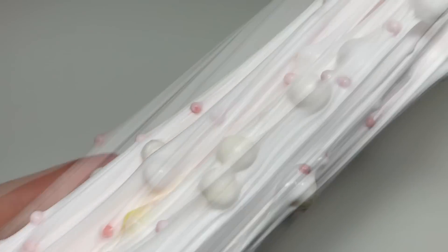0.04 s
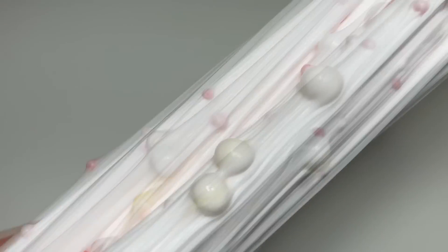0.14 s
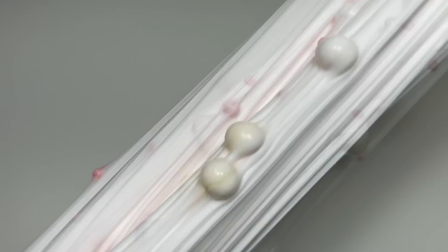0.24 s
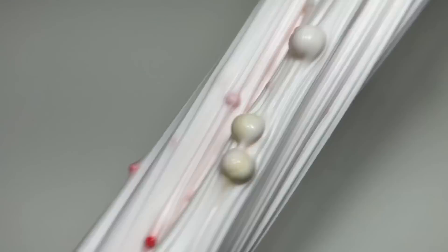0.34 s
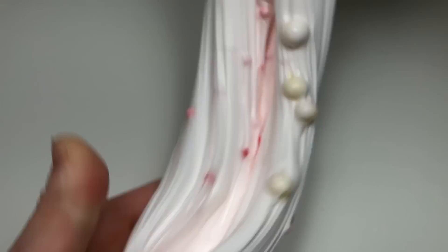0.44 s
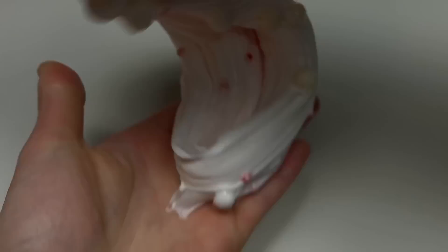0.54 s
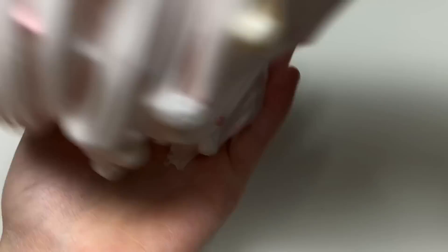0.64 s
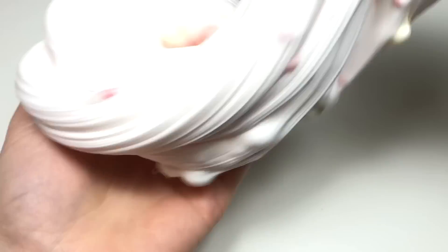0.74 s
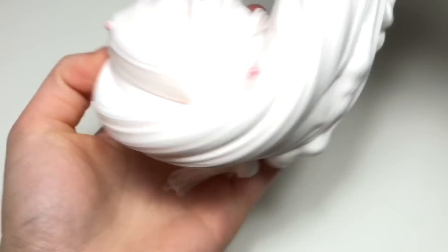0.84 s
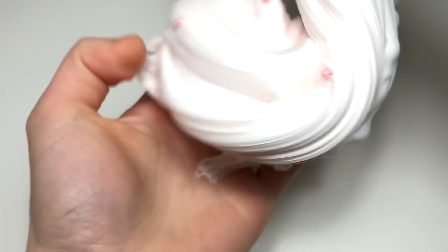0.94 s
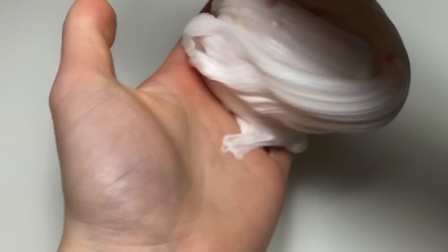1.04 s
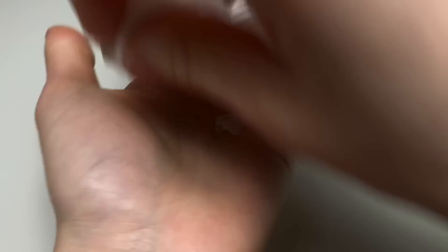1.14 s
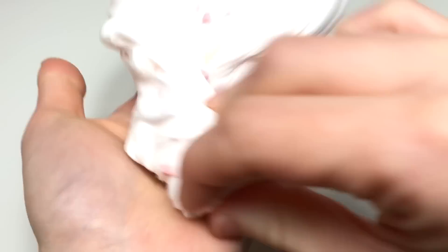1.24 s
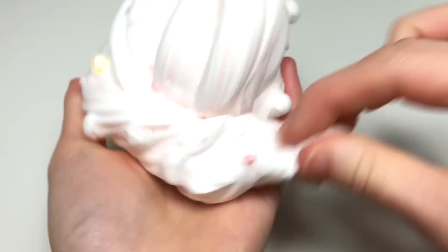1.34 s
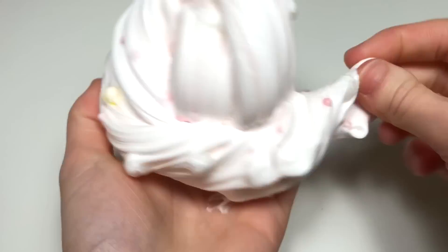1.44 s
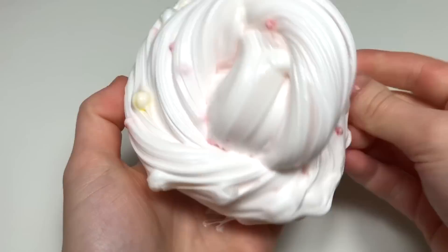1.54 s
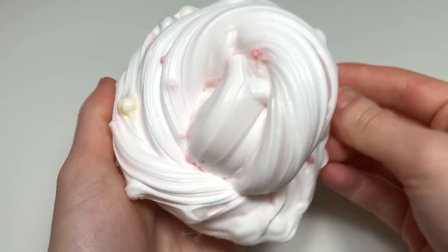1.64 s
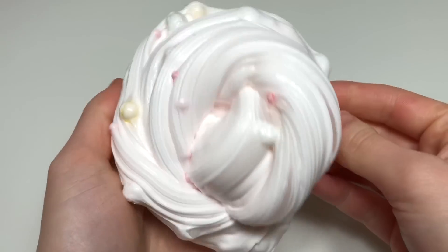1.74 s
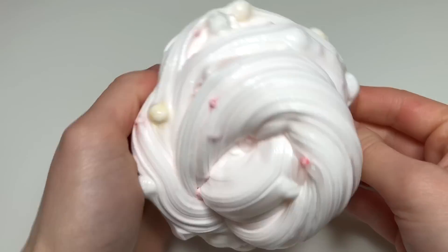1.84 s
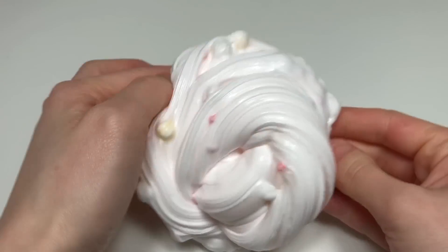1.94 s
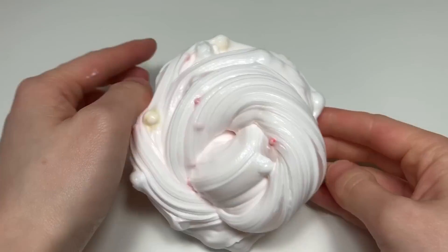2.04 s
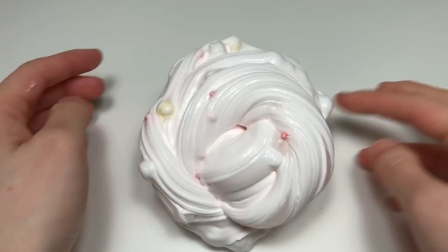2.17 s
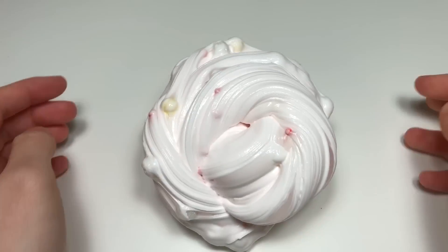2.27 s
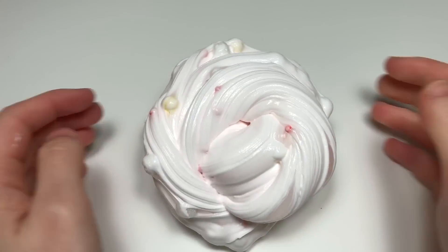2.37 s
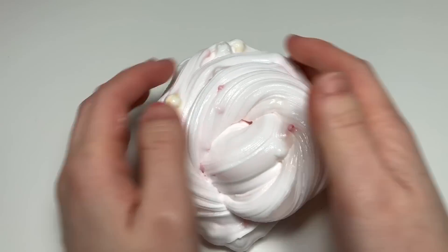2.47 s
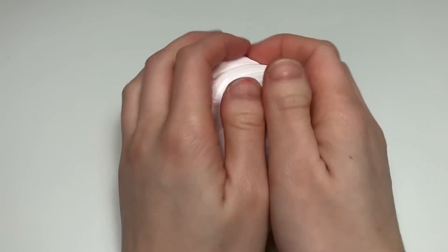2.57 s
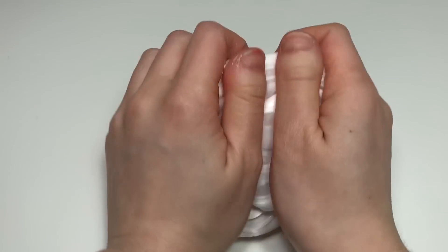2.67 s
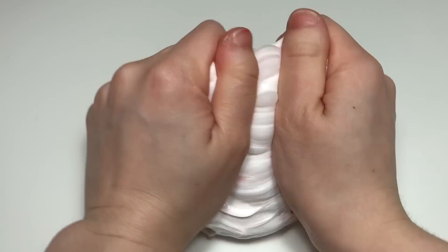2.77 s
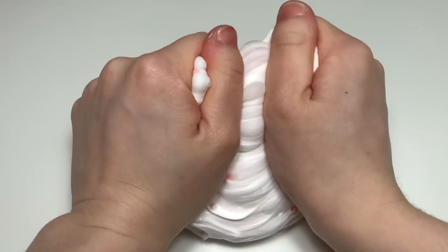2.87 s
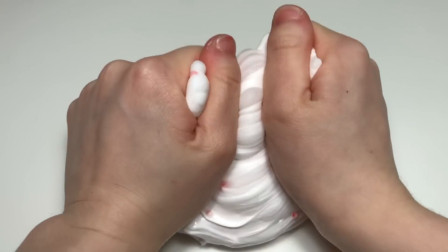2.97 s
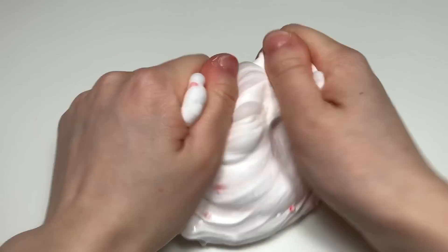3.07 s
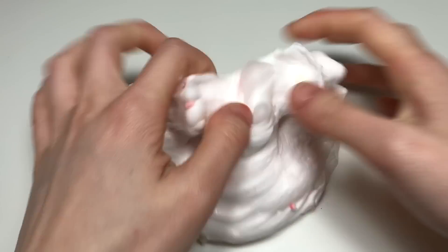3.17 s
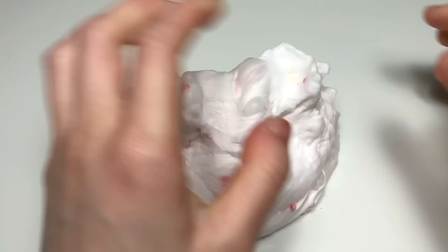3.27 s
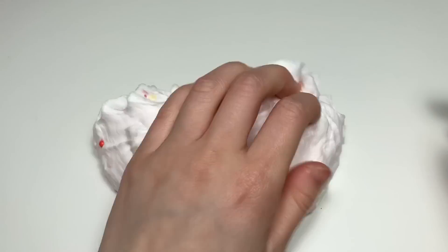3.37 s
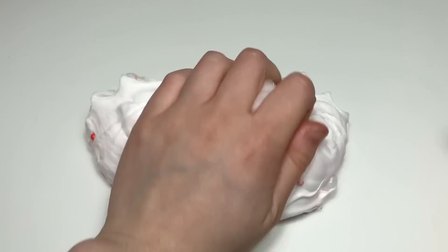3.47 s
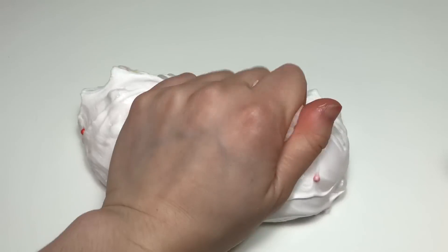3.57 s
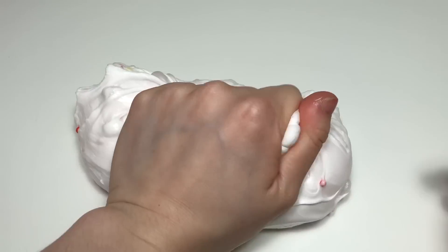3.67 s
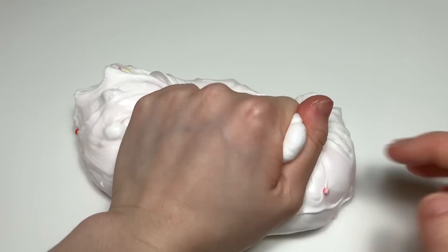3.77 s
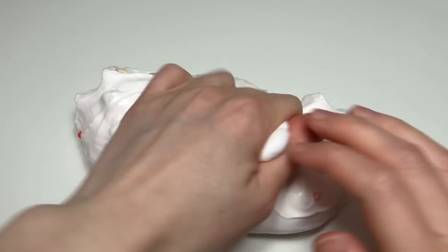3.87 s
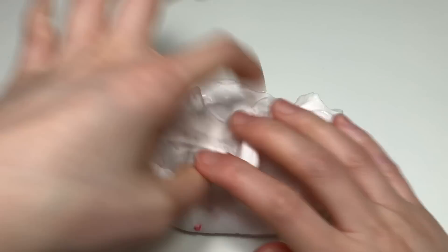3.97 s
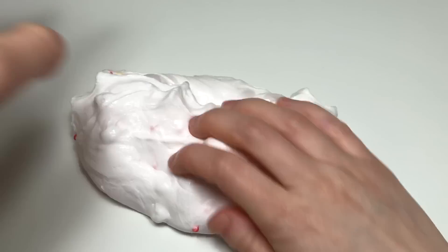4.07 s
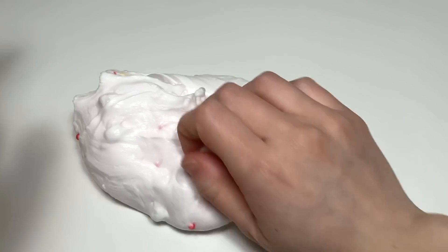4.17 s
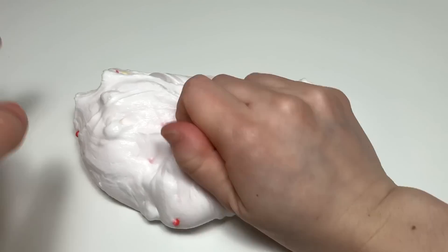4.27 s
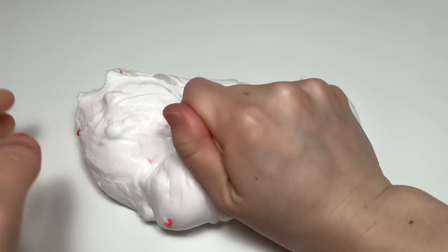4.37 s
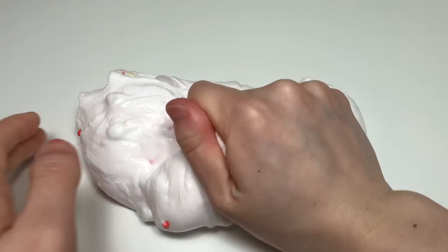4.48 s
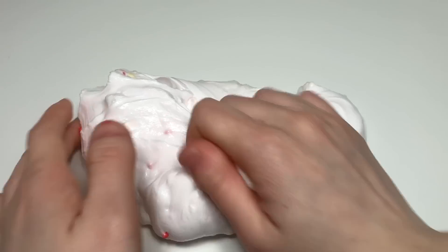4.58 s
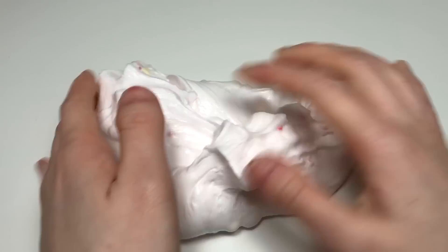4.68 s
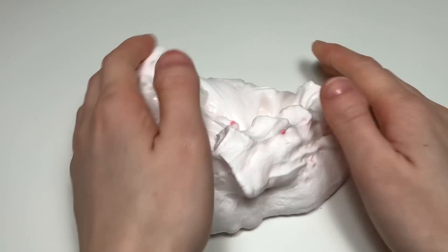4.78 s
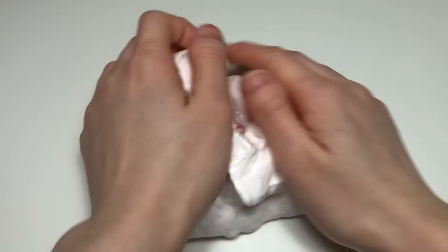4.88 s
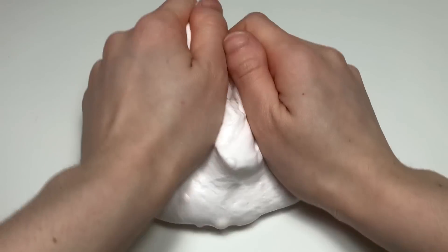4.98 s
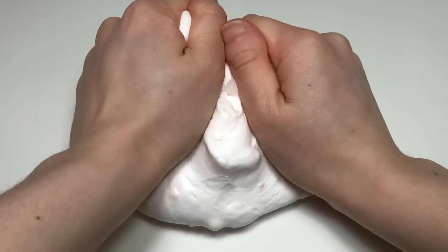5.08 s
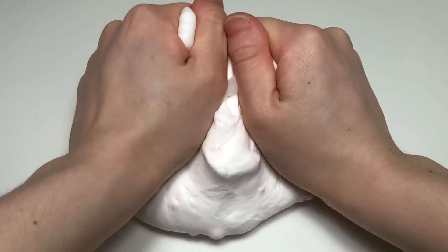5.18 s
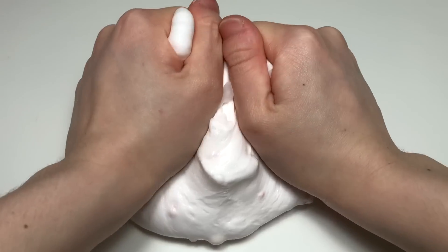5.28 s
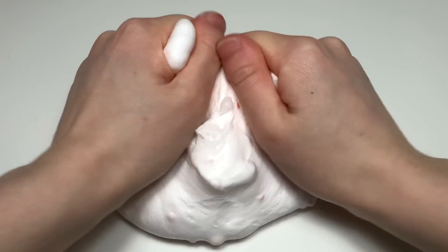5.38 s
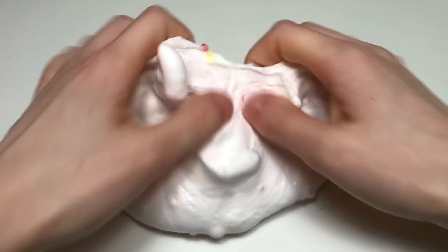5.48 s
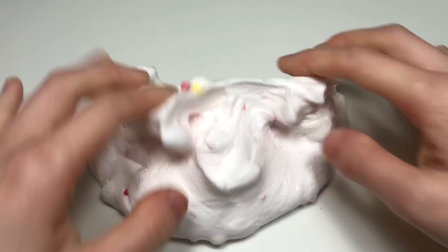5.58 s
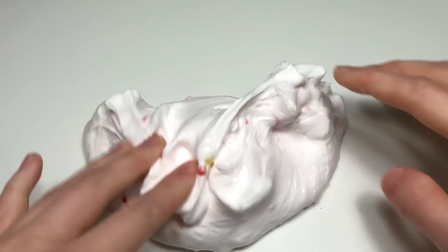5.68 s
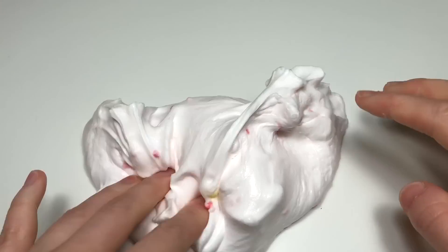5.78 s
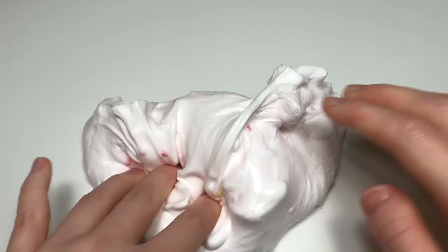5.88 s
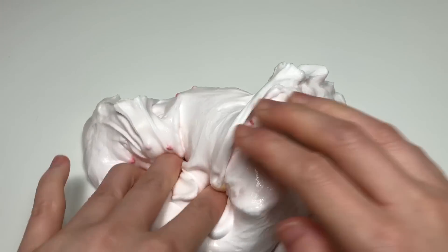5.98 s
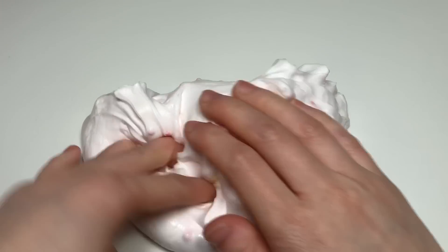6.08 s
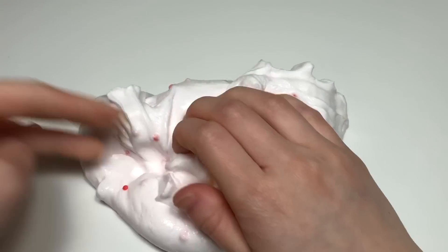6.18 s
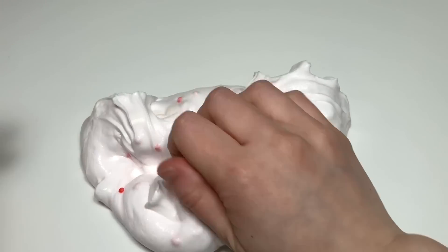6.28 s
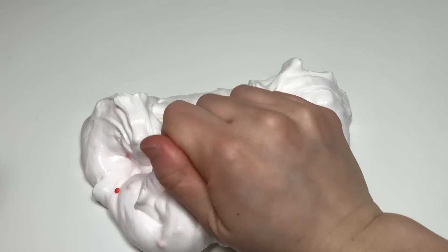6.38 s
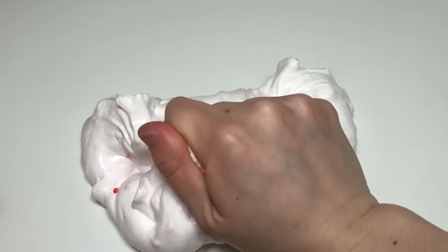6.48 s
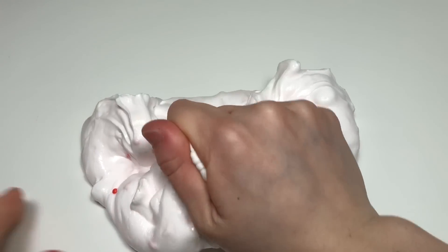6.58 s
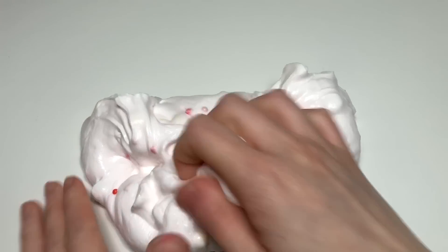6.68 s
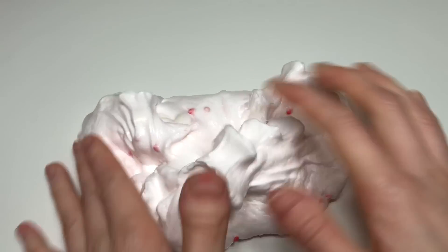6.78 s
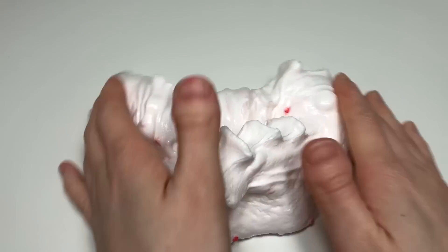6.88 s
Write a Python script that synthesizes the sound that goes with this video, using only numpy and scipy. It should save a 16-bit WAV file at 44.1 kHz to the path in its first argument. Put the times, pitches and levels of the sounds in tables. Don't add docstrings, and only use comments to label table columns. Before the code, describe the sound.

Close wet slime handling: soft tearing fizz and small thuds, then four or five dense volleys of snapping air pockets with squelches and gulps.

```python
import sys
import numpy as np
from scipy import signal
from scipy.fft import rfft, irfft, next_fast_len
from scipy.io import wavfile
from scipy.ndimage import uniform_filter1d, map_coordinates

SR = 44100
rng = np.random.default_rng(int(sys.argv[2]) if len(sys.argv) > 2 else 0)


def makeup_ratio(level_db):
    decades = np.asarray(level_db, float) / 20
    return 10 ** decades


def file_out(sig):
    cols = np.atleast_2d(sig).T
    lim = np.clip(cols, -1, 1)
    pcm = np.round(lim * 32767).astype(np.int16)
    wavfile.write(sys.argv[1], SR, pcm)


N = 305172


def unit(x):
    return x / np.sqrt(np.mean(x ** 2) + 1e-20)


def along(points, hz):
    f, value = np.transpose(points)
    return np.interp(np.log(hz + 1), np.log(f + 1), value)


def filtered(x, response):
    size = next_fast_len(N + 8192)
    hz = np.fft.rfftfreq(size, 1 / SR)
    return irfft(rfft(x, size) * response(hz), size)[:N]


def coloured(x, spectrum):
    return filtered(x, lambda hz: makeup_ratio(along(spectrum, hz)))


def wobble(rate):
    knots = rng.standard_normal(int(N * rate / SR) + 4)
    return map_coordinates(knots, [np.arange(N) * rate / SR])


def modes(table):
    def response(f):
        total = 0
        for k, (centre, width, db) in enumerate(table):
            damping = 1j * f * width
            total = total + (-1) ** k * makeup_ratio(db) * damping / (centre * centre - f * f + damping)
        return total
    return response


def laid(start_s, shapes):
    at = np.round(start_s * SR).astype(int)[:, None] + np.arange(shapes.shape[1])
    return np.bincount(at.ravel(), shapes.ravel(), N + SR)[:N]


def rung(hz, cycles, t):
    return np.sin(2 * np.pi * hz * t) * np.exp(-t * hz / cycles)


def banded(noise, hz, cycles):
    kernel = rung(hz, cycles, np.arange(128) / SR)
    kernel /= np.linalg.norm(kernel, axis=1, keepdims=True)
    return signal.fftconvolve(noise, kernel, axes=1)[:, :noise.shape[1]]


def patchy(x, depth_db):
    z = signal.stft(x, nperseg=256)[2]
    field = uniform_filter1d(rng.standard_normal(z.shape), size=9, axis=0)
    field = uniform_filter1d(field, size=18, axis=1)
    return signal.istft(z * makeup_ratio(depth_db * unit(field)), nperseg=256)[1][:N]


def swells(peak_s, db, rise_s, fall_s):
    roundness = 1.8
    at = np.arange(0, N + 64, 64)
    late = at[:, None] / SR - peak_s
    away = np.maximum(late / np.clip(fall_s, .01, 9), -late / np.clip(rise_s, .01, 9))
    power = np.sum(makeup_ratio(db - 20 * away ** roundness) ** 2, axis=1)
    return np.interp(np.arange(N), at, 10 * np.log10(power + 3e-8))


def background():
    # (frequency [Hz], density [dB per Hz])
    air_colour = [(15, -45.5), (25, 7.5), (124, -16.5), (167, 3), (1140, -8), (4100, -53), (5830, -15),
                  (15500, -42)]
    # (frequency [Hz], level [dB])
    partials = [(118.4, -70)]
    mix = makeup_ratio(-70.5) * unit(coloured(rng.standard_normal(N), air_colour))
    for hz, db in partials:
        level = makeup_ratio(db + 2.5 + 1.4 * wobble(3.6))
        mix = mix + level * np.sin(2 * np.pi * hz * np.arange(N) / SR + .4 * wobble(14))
    return mix


def effort():
    # (peak time [s], fizz level [dB], 20 dB rise [s], 20 dB fall [s],
    # squelch over fizz [dB])
    pulls = [(0.15, -53.5, .5, .33, -6), (0.445, -47, .03, .09, 3), (0.56, -52, .07, .11, 3),
             (0.88, -57, .4, .22, -3), (1.2, -61, .18, .2, 4), (1.42, -54, .22, .2, -1),
             (1.635, -54, .05, .055, 2), (1.73, -57, .02, .3, 5), (1.96, -52, .2, .2, -4),
             (2.085, -63, .07, .05, 10), (2.22, -55, .12, .11, -2), (2.43, -52.5, .19, .14, -9)]
    # (peak time [s], fizz level [dB], 20 dB rise [s], 20 dB fall [s],
    # squelch over fizz [dB])
    kneads = [(2.672, -48, 0.012, 0.2, 3), (2.85, -37.5, 0.1423, 0.16, 5.5), (2.96, -28, 0.07, 0.135, -3),
              (3.21, -36, 0.13, 0.085, 3), (3.445, -58, 0.012, 0.4, 1), (3.66, -34, 0.1261, 0.1, 1),
              (3.77, -35, 0.1, .13, -18), (3.99, -44.5, 0.085, 0.1, 6), (4.24, -43, 0.35, 0.46, -11.5),
              (4.446, -26, 0.0226, 0.0865, -11), (4.569, -29.5, .04, 0.08, -3.5),
              (4.678, -42, .12, 0.09, 3.5), (4.95, -43, 0.12, 0.41, -9), (5.19, -31, 0.07, 0.06, 2),
              (5.27, -30, 0.18, 0.1552, -19), (5.32, -33, 0.07, 0.07, 2), (5.521, -43.5, 0.23, 0.1, 1.5),
              (5.7, -68, 1.2, 0.19, 3), (6.185, -45, .02, 0.08, 8), (6.36, -45, 0.22, 0.23, -6),
              (6.52, -33.5, 0.0736, 0.18, -20), (6.587, -31.5, 0.0529, 0.07, 1.5),
              (6.75, -42.5, 0.09, 0.07, 5), (6.9, -47.5, 0.28, 4, -2.5)]
    s, db, rise_s, fall_s, wet_db = np.transpose(pulls + kneads)
    return swells(s, db, rise_s, fall_s), swells(s, db + wet_db, rise_s, fall_s)


def crackle(colour, count, centre_hz, cycles, spread_db, smooth, clump_db):
    at = rng.random(count) * N / SR
    size = makeup_ratio(spread_db * rng.exponential(size=(count, 1)))
    hz = centre_hz * np.exp(0.533 * rng.standard_normal((count, 1)))
    hz = np.clip(hz, 200, SR / 3)
    bursts = laid(at, size * rung(hz, cycles, np.arange(300) / SR))
    bursts /= np.sqrt(np.abs(uniform_filter1d(bursts ** 2, SR // 8)) + 1e-9)
    mix = (bursts + smooth * rng.standard_normal(N)) * makeup_ratio(clump_db * wobble(35))
    return unit(coloured(patchy(mix, depth_db=3.0), colour))


def tearing():
    # (frequency [Hz], density [dB per Hz])
    fizz_colour = [(500, -43), (1500, -14), (3500, -4.5), (8000, -4), (15800, -6.5)]
    # (frequency [Hz], density [dB per Hz])
    squelch_colour = [(150, -30), (400, -9), (1100, -5.5), (2600, -6.5), (5000, -8), (10000, -46)]
    fizz_db, squelch_db = effort()
    fizz = crackle(fizz_colour, count=6000, centre_hz=8000, cycles=1.3,
                   spread_db=2, smooth=1.4, clump_db=1.5)
    sizzle = unit(np.diff(rng.standard_normal(N + 2), 2))
    squelch = crackle(squelch_colour, count=4500, centre_hz=1700, cycles=1.8,
                      spread_db=3.2, smooth=.9, clump_db=2.5)
    mix = makeup_ratio(fizz_db + 0.5) * fizz
    mix = mix + makeup_ratio(0.82 * fizz_db - 20.5) * sizzle
    return mix + makeup_ratio(squelch_db - 1.5) * squelch


def pockets():
    # (time [s], peak level [dB], pitch [Hz])
    ticks = [(0.0059, -26, 5200), (0.016, -32.5, 2000), (0.0418, -31, 6300), (0.0487, -34.5, 9300),
             (0.1111, -31, 4890), (0.132, -25.5, 8000), (0.145, -36, 5900), (0.1496, -31, 3300),
             (0.164, -36, 2400), (0.1683, -36, 7800), (0.1722, -27.5, 6800), (0.187, -34.5, 2100),
             (0.2135, -29, 5360), (0.2327, -29.5, 2980), (0.245, -33, 2500), (0.2609, -28.5, 10400),
             (0.2675, -25.5, 8900), (0.2783, -28.5, 6000), (0.3224, -42, 6000), (0.3301, -45, 8400),
             (0.3534, -37, 6500), (0.4212, -36, 5700), (0.5256, -24.5, 9700), (0.5272, -24, 6400),
             (0.5498, -32, 3900), (0.5782, -34, 2290), (0.636, -40, 5200), (0.7132, -43, 7900),
             (0.7285, -27.5, 1950), (0.7605, -29.5, 1660), (0.775, -41, 2200), (0.9449, -34, 10300),
             (1.0142, -34.5, 13100), (1.0181, -38.5, 9400), (1.0224, -33, 7000), (1.0288, -33, 5400),
             (1.1329, -42, 11000), (1.1608, -36, 9700), (1.3207, -34.5, 8200), (1.326, -37, 8500),
             (1.3965, -37, 6900), (1.4087, -31, 7700), (1.429, -34, 3200), (1.4942, -34, 10400),
             (1.5007, -25, 12500), (1.7114, -28, 1660), (1.9387, -30, 4000), (1.9611, -27, 3300),
             (1.973, -36, 3200), (2.013, -32.5, 4200), (2.0535, -40, 5600), (2.1462, -44, 4600),
             (2.2432, -39, 4900), (2.6215, -37, 4030), (2.6325, -42, 3000), (2.664, -25.5, 9000),
             (2.6657, -34, 3700), (2.6775, -31.5, 2500), (3.2793, -25.5, 7240), (3.4368, -39, 3100),
             (3.4454, -40, 4360), (3.4545, -35, 3900), (3.457, -38, 2600), (3.465, -42.5, 12000),
             (3.8898, -41, 3700),
             (3.9177, -30, 1800), (3.9483, -24, 5300), (4.0045, -26, 9000), (4.02, -29, 4000),
                  (4.818, -32.5, 1800), (4.829, -27.5, 4100), (4.8576, -27, 4000), (4.933, -25, 7300),
                  (5.4145, -27, 5900), (5.4388, -41, 5200), (5.4798, -21.5, 6800), (5.553, -24.5, 7830),
                  (5.7816, -39, 5600), (5.7976, -48.5, 6600), (5.851, -47, 5000), (5.9404, -49, 2110),
                  (5.9425, -38.5, 1400), (5.9456, -45, 1590), (5.9906, -43, 7400), (6.102, -46, 2000),
                  (6.4367, -30, 10900), (6.806, -27.5, 2600), (6.8338, -21.5, 5330)]
    # (time [s], peak level [dB], pitch [Hz], flutter under peak [dB])
    stretch_pops = [
        (0.3457, -18, 11000, -27),
        (1.88, -18, 5870, -18.5),
    ]
    # (time [s], peak level [dB], pitch [Hz], flutter under peak [dB])
    first_pops = [(2.6887, -17, 1600, -18), (2.7535, -8.5, 3700, -15), (2.755, -4.5, 4800, -24),
                  (2.7766, -14.5, 4800, -25), (2.7823, -2.5, 3500, -30.5), (2.7908, 2.5, 4600, -28),
                  (2.8054, 2.5, 6100, -28), (2.8117, -6.5, 9500, -16), (2.8142, -3, 8700, -27.5),
                  (2.8184, 1.5, 7400, -11), (2.8215, 0.5, 7900, -23), (2.825, -6, 5000, -18),
                  (2.8376, -3, 8900, -22.5), (2.8385, -1.5, 8900, -26), (2.8466, -2, 5400, -12),
                  (2.849, -1, 4800, -12), (2.8518, 1, 6900, -22.5), (2.863, -15.5, 5900, -18.5),
                  (2.8724, 2.5, 10300, -21), (2.8921, -1, 9900, -30.5), (2.9006, -5, 11200, -19.5),
                  (2.9017, -6.5, 11000, -20), (2.9054, -1.5, 12000, -24.5), (2.911, -1.5, 10900, -29),
                  (2.9148, -11, 10500, -25), (2.9301, 0, 4600, -17), (2.949, 4, 8500, -15),
                  (2.9516, 2, 9300, -18.5), (2.954, 1.5, 8700, -25), (2.962, 1, 5700, -14),
                  (2.964, 3.5, 8200, -17.5), (2.9744, 1, 7300, -21.5), (2.9933, 0, 7300, -12.5),
                  (2.995, -5, 7100, -18), (3.009, -10.5, 9400, -20), (3.0155, -7, 7000, -16.5),
                  (3.0361, 3, 4700, -25), (3.091, -22, 5500, -15), (3.138, -11.5, 6800, -16.5),
                  (3.1634, -12.5, 2000, -18)]
    # (time [s], peak level [dB], pitch [Hz], flutter under peak [dB])
    second_pops = [(3.4906, -8.5, 3850, -14), (3.5555, -14, 3700, -18.5), (3.5671, -15.5, 7300, -20),
                   (3.589, -17, 7820, -18), (3.608, -20, 2800, -23), (3.6126, -6.5, 4400, -16),
                   (3.6199, -7.5, 7280, -28), (3.626, -15, 4590, -21), (3.6334, -16.5, 4400, -21),
                   (3.6381, -3.5, 3990, -25), (3.6416, 3, 3646, -14.5), (3.6434, 3.5, 6160, -15.5),
                   (3.6654, -4.5, 7110, -24.5), (3.67, 2, 6800, -29.5), (3.676, 4, 9800, -26),
                   (3.6777, -6.5, 7080, -22), (3.6839, 4, 11480, -28.5), (3.6943, 5, 5460, -19),
                   (3.6965, -5.5, 7440, -19), (3.711, -12.5, 8830, -23), (3.7244, 6.5, 7940, -25.5),
                   (3.7338, 4.5, 7940, -29.5), (3.7496, -10, 6900, -18.5), (3.76, -8, 7820, -19),
                   (3.7709, -7, 5820, -16.5), (3.776, -10, 10140, -23.5), (3.7839, -17.5, 10760, -26.5),
                   (3.7924, -10, 8890, -24), (3.8065, -13.5, 10100, -23), (3.827, -8.5, 10620, -26),
                   (3.9543, -22.5, 8300, -21.5)]
    # (time [s], peak level [dB], pitch [Hz], flutter under peak [dB])
    third_pops = [(4.1984, -23.5, 9040, -20), (4.209, -26.5, 5600, -19.5), (4.2722, -5, 3410, -21),
                  (4.3294, 0, 8440, -21), (4.332, -10.5, 6960, -16), (4.351, -5, 6600, -17),
                  (4.3544, -10.5, 5490, -19.5), (4.3851, -3, 5100, -21.5), (4.3876, -14, 3390, -17),
                  (4.416, -6.5, 5670, -21), (4.4192, -5.5, 7860, -19.5), (4.4225, -1.5, 8900, -19),
                  (4.425, -8, 8100, -17.5), (4.4342, 1.5, 6200, -19), (4.4432, -6.5, 4610, -13),
                  (4.4492, -1.5, 9500, -17), (4.4735, -4.5, 6280, -23), (4.485, -6, 6830, -19),
                  (4.4919, -3, 9540, -22), (4.4938, -9, 10840, -18), (4.501, -10.5, 6090, -15),
                  (4.5505, -6, 12130, -17.5), (4.5538, 2.5, 3640, -18.5), (4.5562, -9.5, 4400, -18.5),
                  (4.566, -7.5, 10500, -18), (4.658, -17.5, 2670, -13), (4.7109, -16, 5520, -23)]
    # (time [s], peak level [dB], pitch [Hz], flutter under peak [dB])
    fourth_pops = [(4.9766, -20, 4880, -21), (5.0276, -14.5, 6690, -20), (5.0304, -20, 6900, -21),
                   (5.0457, -26, 3684, -21.5), (5.0516, -13.5, 8300, -31), (5.0684, -9, 2980, -20.5),
                   (5.0788, -20.5, 4500, -9.5), (5.094, -6.5, 7640, -11.5), (5.1013, -11, 6760, -19),
                   (5.161, -20, 2500, -16), (5.1287, -13, 10800, -17.5), (5.145, -5.5, 6200, -33),
                   (5.1543, -11.5, 9000, -21.5), (5.1719, 0.5, 4760, -12), (5.192, -10, 10450, -16),
                   (5.2033, 3, 9500, -19.5), (5.204, -1, 2800, -18), (5.2234, -12.5, 4720, -18),
                   (5.234, -1.5, 7210, -16.5), (5.2362, -8, 7700, -20), (5.2495, -5.5, 7750, -18.5),
                   (5.2688, -3, 7300, -21), (5.28, -11.5, 7800, -16.5), (5.2887, -2.5, 6630, -17),
                   (5.2907, 0.5, 7330, -19), (5.3144, -11.5, 4510, -21.5), (5.322, -6.5, 5400, -17.5),
                   (5.3251, -3, 2486, -13), (5.3731, -4, 10300, -17)]
    # (time [s], peak level [dB], pitch [Hz], flutter under peak [dB])
    last_pops = [(6.1742, 1.5, 4960, -24.5), (6.1768, -19, 3080, -22), (6.2155, -12, 3340, -20),
                 (6.22, -16, 2500, -21.5), (6.2257, -11, 7000, -23), (6.361, -20, 8300, -28),
                 (6.3655, -19, 7000, -28), (6.384, -6.5, 8330, -16.5), (6.389, -18.5, 9800, -23.5),
                 (6.4005, -14, 4950, -29), (6.4433, -8, 9900, -34), (6.4478, 1.5, 8060, -30.5),
                 (6.452, -18, 6300, -21), (6.4812, 0.5, 7580, -16), (6.4829, 1, 8200, -21.5),
                 (6.4847, -12.5, 6700, -18), (6.5068, -1.5, 9900, -20.5), (6.51, 3, 5120, -21.5),
                 (6.5125, -7, 5480, -17.5), (6.5545, -4, 5120, -24), (6.5724, 2, 8870, -27),
                 (6.5774, 1, 7640, -21.5), (6.5831, 3, 7050, -18.5), (6.5866, -3, 4300, -20.5),
                 (6.5991, -11.5, 5200, -17.5), (6.6663, -2, 7350, -29.5), (6.7123, -23, 2900, -15.5),
                 (6.733, -15.5, 3240, -14.5), (6.7536, -27, 2100, -17), (6.786, -20.5, 8130, -16.5),
                 (6.8921, -20, 4900, -20)]
    tick_flutter_db = -20.5
    tiny = [(s, db, hz, tick_flutter_db) for s, db, hz in ticks]
    return stretch_pops + first_pops + second_pops + third_pops + fourth_pops + last_pops + tiny


def pops():
    s, db, hz, flutter_db = np.transpose(pockets())[:, :, None]
    t = np.arange(900) / SR
    since = t - .0004
    noise = rng.standard_normal((len(s), 2, len(t)))
    thin = (hz / 8000) ** 1.1
    u = since * hz
    snap = makeup_ratio(2.5) * np.sin(2 * np.pi * 0.96 * u + 0.21) * np.exp(-(u / 0.39) ** 2)
    film_tick = makeup_ratio(-6) * thin * noise[:, 1] * np.exp(-(since / .0001) ** 2)
    late = np.clip(since, 0, None)
    fading = makeup_ratio(-60 * late / 0.014) + makeup_ratio(-18.5 - 60 * late / 0.024)
    fading = fading * (1 - np.exp(-late / 0.0005))
    flutter = banded(noise[:, 0], hz, 0.7 * (8000 / hz) ** 0.2)
    flutter = flutter + makeup_ratio(-3) * thin * np.diff(noise[:, 1], prepend=0)
    burst = snap + film_tick + makeup_ratio(flutter_db + 8.5) * fading * flutter
    return laid(np.clip(s[:, 0] - .0004, 0, None), makeup_ratio(db) * burst)


def room(x):
    # (frequency [Hz], t60 [s])
    decay = [(300, 0.25), (2000, 0.11), (14000, 0.19)]
    hz, t, z = signal.stft(rng.standard_normal(SR // 3), SR, nperseg=256)
    dying = makeup_ratio(-60 * t / along(decay, hz)[:, None])
    tail = signal.istft(z * dying, SR, nperseg=256)[1]
    delayed = np.pad(x, (200, 0))
    return signal.fftconvolve(delayed, tail / np.linalg.norm(tail))[:N]


def rips():
    # (time [s], peak level [dB], colour [Hz], length [s])
    strips = [(0.098, -36.5, 2870, 0.0059), (0.429, -31.5, 4300, 0.004), (0.447, -28, 2310, 0.0079),
              (0.469, -32, 2470, 0.0048), (0.517, -34, 3440, 0.0072), (0.558, -29.5, 1960, 0.0059),
              (1.02, -41, 2840, 0.0049), (1.948, -30.5, 3320, 0.005), (2.704, -28, 1720, 0.0053),
              (3.587, -18.5, 3010, 0.002), (3.603, -16.5, 5300, 0.01), (4.666, -20, 1150, 0.0055),
              (5.042, -23, 2480, 0.0043), (5.544, -25, 8500, 0.0036), (6.708, -23.5, 3080, 0.0049),
              (6.749, -19.5, 1090, 0.0037), (5.123, -19, 4970, 0.0037), (5.189, -14, 9600, 0.0026),
              (5.247, -11.5, 8160, 0.0063), (3.747, -14, 7100, 0.0068), (3.919, -33, 1940, 0.0052)]
    s, db, hz, length_s = np.transpose(strips)[:, :, None]
    t = np.arange(2600) / SR
    noise = rng.standard_normal((len(s), 3, len(t)))
    lumps = makeup_ratio(33.7 * uniform_filter1d(noise[:, 2], 60, axis=1))
    burst = banded(lumps * noise[:, 0], hz, 0.99) + makeup_ratio(-5.5) * lumps * noise[:, 1]
    u = t / np.clip(length_s, .001, .014)
    return laid(s[:, 0], makeup_ratio(db - 12.5) * burst * u * np.exp(1 - u))


def thuds():
    # (time [s], peak level [dB], shake while the weight settles [dB])
    landings = [(0.573, -37.5, -58), (0.811, -47, -65), (1.709, -33, -56), (1.811, -33.5, -48.5),
                (2.223, -30, -56.5), (2.697, -34.5, -54), (3.183, -34.5, -38.5), (3.965, -44, -45),
                (4.068, -32.5, -74), (4.67, -26, -44), (4.852, -24, -50.5), (4.992, -38, -53),
                (5.165, -38, -44), (5.47, -46, -50.5), (5.63, -37.5, -59), (5.78, -50, -60.5),
                (6.202, -20, -38), (6.76, -25, -42.5)]
    # (frequency [Hz], width [Hz], level [dB])
    table_top = [(51, 17, -6.5), (116.2, 16, 1), (309.4, 210, -10.5)]
    s, db, settle_db = np.transpose(landings)[:, :, None]
    t = np.arange(1024) / SR
    push = laid(s[:, 0], makeup_ratio(db + 10.5) * t / 0.00079 * np.exp(1 - t / 0.00062))
    uneven = makeup_ratio(4 * wobble(22))
    shake = unit(filtered(rng.standard_normal(N) * uneven, modes(table_top)))
    settling = makeup_ratio(swells(s[:, 0] + 0.0088, settle_db[:, 0], rise_s=0.05, fall_s=0.13))
    kneading = makeup_ratio(-42 + 0.37 * effort()[1])
    return filtered(push, modes(table_top)) + makeup_ratio(2.5) * np.hypot(settling, kneading) * shake


def gulps():
    # (time [s], peak level [dB], pitch [Hz])
    cave_ins = [(1.711, -32, 1130), (2.755, -22, 359), (2.784, -19.5, 406), (2.846, -19, 453),
                (2.93, -14.5, 1380), (3.035, -33, 810), (3.132, -33.5, 482), (3.491, -26, 448),
                (3.522, -35.5, 950), (3.591, -28.5, 300), (3.64, -17, 374), (3.676, -27, 380),
                (3.695, -28, 448), (4.33, -25, 462), (4.383, -32, 1232), (4.45, -22, 478),
                (4.553, -19.5, 1180), (5.067, -31.5, 480), (5.169, -21, 274), (5.289, -13, 1300),
                (5.321, -14.5, 1245), (6.177, -23, 288), (6.216, -20.5, 830), (6.481, -37, 953),
                (1.713, -33.5, 302), (5.733, -50.5, 893), (5.759, -53, 1130), (5.811, -48, 1004),
                (5.848, -52, 1270), (5.917, -53, 1530), (6.116, -51.5, 1070)]
    s, db, hz = np.transpose(cave_ins)[:, :, None]
    u = np.arange(1024) / SR * hz
    turns = u + 0.53 * (1 - np.exp(-u / 0.15))
    swell = u / 1.38 * np.exp(1 - u / 0.83)
    return laid(s[:, 0], makeup_ratio(db + 7) * np.sin(2 * np.pi * turns) * swell)


def slides():
    # (time [s], half length [s], level [dB])
    strokes = [
        (2.413, 0.089, -60),
        (4.203, 0.073, -58),
        (4.936, 0.12, -53.5),
    ]
    # (frequency [Hz], width [Hz], level [dB])
    hollow = [(1640, 60, 9), (2600, 260, 0)]
    t = np.arange(N) / SR
    stroke = sum(makeup_ratio(db) * np.exp(-((t - s) / half_s) ** 2) for s, half_s, db in strokes)
    return stroke * unit(filtered(rng.standard_normal(N), modes(hollow)))


def scene():
    def lagging(hz):
        return np.exp(2j * np.pi * 1295 / (hz + 200))

    def small_source(hz):
        return (1j * hz / (260 + 1j * hz)) ** 2

    burst = filtered(filtered(pops(), lagging) + rips() + gulps(), small_source)
    mix = burst + makeup_ratio(-18.0) * room(burst)
    return (mix + tearing() + slides() + thuds() + background())[None]


def low_pass(x):
    return signal.sosfilt(signal.butter(12, 16480, fs=SR, output="sos"), x)


def record(dry):
    clipped = dry[0] / (1 + np.abs(dry[0] / 1.05) ** 8) ** (1 / 8)

    def shaping(hz):
        top = makeup_ratio(-30 * np.clip((hz - 15700) / 300, 0, 1))
        return top * (1j * hz / (30 + 1j * hz)) ** 2

    return low_pass(filtered(clipped, shaping)[None])


dry = scene()
out = record(dry)
file_out(out)
```